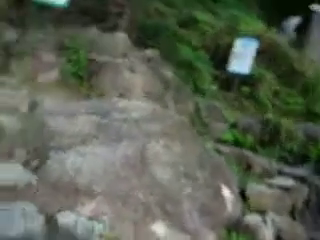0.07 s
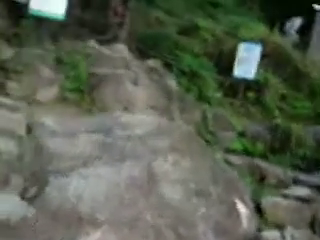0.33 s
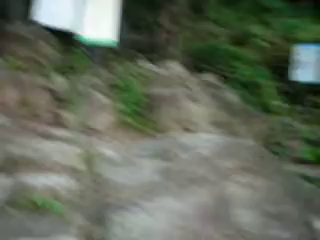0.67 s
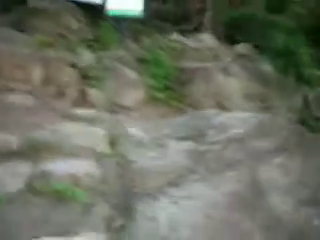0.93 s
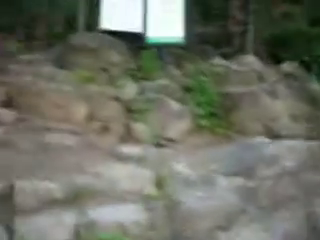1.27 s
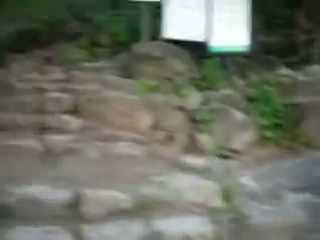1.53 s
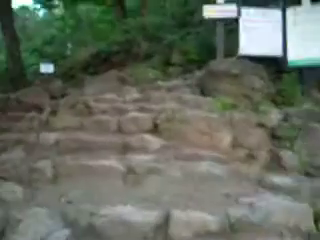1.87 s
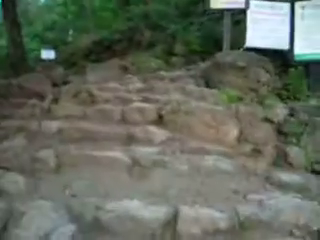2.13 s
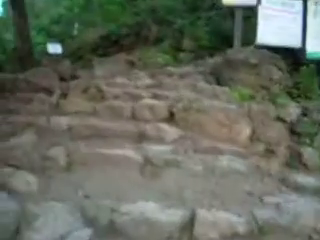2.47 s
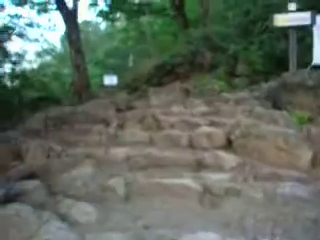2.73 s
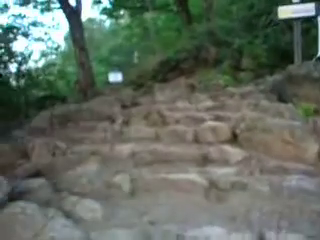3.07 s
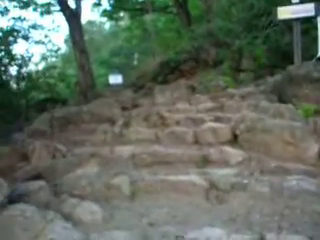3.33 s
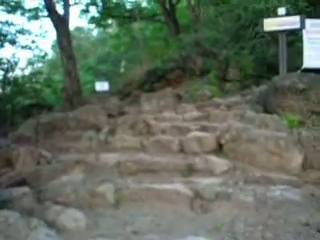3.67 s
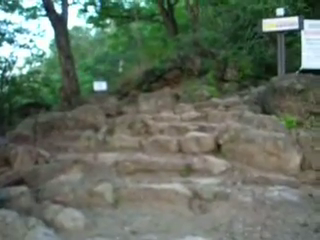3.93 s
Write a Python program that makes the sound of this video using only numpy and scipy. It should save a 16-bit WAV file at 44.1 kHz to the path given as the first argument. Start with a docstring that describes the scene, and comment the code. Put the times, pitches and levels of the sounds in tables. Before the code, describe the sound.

Camera handling clatter, with dull bumps and scattered clicks above a faint, steady outdoor hiss.

```python
"""Camera handled on a forest path

A small camera is carried and turned on a rocky path. Hard parts click and rattle against its case
and ring its modes; after two heavy knocks a loose part hums on. The hand bumps and rubs the shell.
Behind it runs a soft steady rush, like a stream or wind in leaves."""
import sys
import numpy as np
from scipy import signal
from scipy.fft import rfft, irfft
from scipy.io import wavfile
from scipy.ndimage import uniform_filter1d

SR = 44100
rng = np.random.default_rng(int(sys.argv[2]) if len(sys.argv) > 2 else 0)


def unload_wav(signal):
    """Save mono or channel-first audio to the path in sys.argv[1] as 16-bit WAV at rate SR, clipped to [-1, 1]."""
    wavfile.write(
        sys.argv[1],
        SR,
        np.round(np.clip(np.atleast_2d(signal).T, -1, 1) * 32767).astype(np.int16),
    )


N = 176400
T = np.arange(N) / SR
BAND_HZ = 4250


def from_db(db):
    """Decibels to gain."""
    return 10 ** (np.asarray(db) / 20)


def unit_rms(x):
    """Scale to rms 1."""
    return x / np.sqrt(np.mean(x ** 2) + 1e-20)


def add(out, start_s, x):
    """Mix x in at start_s."""
    i = max(int(start_s * SR), 0)
    out[i:i + len(x)] += x[:N - i]


def butter(x, hz, kind, order=2):
    """Butterworth low- or high-pass."""
    return signal.sosfilt(signal.butter(order, hz, kind, fs=SR, output="sos"), x + 1e-18)


def coloured(noise, spectrum):
    """Shape noise to a spectrum, cut just above BAND_HZ; rms 1."""
    hz = np.arange(N // 2 + 1) * SR / N + 1e-6
    points_hz, points_db = np.transpose(spectrum)
    gain = from_db(np.interp(np.log(hz), np.log(points_hz), points_db))
    return unit_rms(irfft(rfft(noise) * gain * (hz < 1.1 * BAND_HZ), N))


def drift(hz):
    """Random wander below hz; rms 1."""
    return unit_rms(butter(rng.standard_normal(N + SR), hz, "low")[SR:])


def ring(x, hz, t60_s):
    """One mode: a unit click starts a decaying sine of height 1."""
    radius, angle = from_db(-60 / (t60_s * SR)), 2 * np.pi * hz / SR
    return signal.lfilter([0, np.sin(angle)], [1, -2 * radius * np.cos(angle), radius ** 2], x + 1e-18)


def emphasise(x, hz, db, q=2.2):
    """Lift a broad band around hz."""
    return x + (from_db(db) - 1) * signal.lfilter(*signal.iirpeak(hz, q, fs=SR), x)


def disperse(x, q=1.08):
    """The shell delays each pitch differently, so a blow swells over about 1 ms."""
    for hz in np.geomspace(BAND_HZ / 5, BAND_HZ, 5):
        x = x - 2 * signal.lfilter(*signal.iirpeak(hz, q, fs=SR), x)  # all-pass
    return x


# Rush spectra: f/Hz, level/dB
RUSH_LOW_SPECTRUM = [(25, -17.5), (150, -15), (250, -4.5), (440, -2), (800, -4), (1200, -10), (4000, -29)]
RUSH_HIGH_SPECTRUM = [(300, -12), (800, -5), (1500, 1.34), (3400, 1.4), (3900, -3.5), (4400, -18)]
# Rush envelopes: t/s, level/dB
RUSH_LOW_LEVEL = [(0, -40.5), (.4, -46), (1.099, -44), (1.448, -48.5), (2.15, -43.5), (2.6, -48),
                  (3.3, -49), (3.6, -44), (4, -49)]
RUSH_HIGH_LEVEL = [(0, -40), (.22, -39.5), (.45, -44.5), (.8, -43.5), (1.1, -47), (1.5, -46),
                   (2.299, -45.5), (3.2, -47.5), (4, -48)]


def rush(flicker_db=1, flicker_hz=13):
    """Steady outdoor noise; its low and high parts shift as the camera turns."""
    out = np.zeros(N)
    for spectrum, envelope in ((RUSH_LOW_SPECTRUM, RUSH_LOW_LEVEL), (RUSH_HIGH_SPECTRUM, RUSH_HIGH_LEVEL)):
        db = np.interp(T, *np.transpose(envelope)) + flicker_db * drift(flicker_hz)
        out += from_db(db) * coloured(rng.standard_normal(N), spectrum)
    return out


# Rubs: t/s, level/dB, rise/s, decay/s, treble/dB
RUBS = [(0.142, -26.5, 0.0078, 0.013, -7), (0.161, -33, 0.0026, 0.011, 2), (0.229, -35.5, 0.0047, 0.013, 8),
        (0.908, -40, 0.0083, 0.11, 4), (1.214, -35, 0.0037, 0.016, 7), (1.789, -33.5, 0.014, 0.036, -7.5)]
# Friction spectrum: f/Hz, level/dB
RUB_SPECTRUM = [(100, -21), (300, 5.5), (1000, 3), (1600, 2.5), (3400, -2.5), (4300, -15.5)]


def hand_rubs(grains_per_s=2700, crossover_hz=2140):
    """The hand slides on the shell: short gritty swells of friction."""
    grains = rng.standard_normal(N) * (rng.random(N) < grains_per_s / SR)
    friction = coloured(grains, RUB_SPECTRUM)
    low = butter(friction, crossover_hz, "low")
    high = -butter(friction, crossover_hz, "high")  # inverted: no notch at the crossover
    out = np.zeros(N)
    for peak_s, db, rise_s, decay_s, treble_db in RUBS:
        swell = np.exp(np.minimum((T - peak_s) / rise_s, (peak_s - T) / decay_s))
        out += from_db(db) * swell * (low + from_db(treble_db) * high)
    return out


# Bumps: t/s, level/dB, f/Hz
BUMPS = [(.020, -29, 187), (0.146, -26.5, 278), (.156, -30.5, 180), (.327, -28, 530), (0.778, -31.5, 242),
         (0.962, -31.5, 198), (1.054, -37, 175), (1.074, -30.5, 190), (1.1, -35.5, 189),
         (1.212, -32.5, 148), (1.332, -33, 178), (1.58, -32, 108), (1.718, -33.5, 196), (1.779, -33, 188),
         (2.199, -37, 150), (2.877, -32.5, 227)]


def hand_bumps(decay_cycles=1.86, low_cut_hz=89):
    """Soft pushes of the hand: dull thuds of a cycle or two."""
    out, t = np.zeros(N), T[:SR // 10]
    for start_s, db, hz in BUMPS:
        age = t * hz * np.log(1000) / decay_cycles
        envelope = age * np.exp(1 - age)
        add(out, start_s, from_db(db) * envelope * np.sin(2 * np.pi * hz * t))
    return butter(out, low_cut_hz, "high")


# Loose part set ringing: t/s, hum/dB, ring/dB
LOOSE_STRIKES = [(.675, -38, -48), (1.581, -42, -35)]
# Its low and high modes: f/Hz, level/dB, t60/s
HUM_MODES = [(232.5, -1, 1.62)]
RING_MODES = [(2650, -1, .2), (2760, 1.5, 0.24), (3115, -9, .45)]


def loose_part():
    """A loose part sounds on after two heavy knocks: low hum, thin high ring."""
    out = np.zeros(N)
    for start_s, hum_db, ring_db in LOOSE_STRIKES:
        for modes, strike_db in ((HUM_MODES, hum_db), (RING_MODES, ring_db)):
            for hz, mode_db, t60_s in modes:
                envelope = from_db(strike_db + mode_db - 60 * T / t60_s)
                add(out, start_s, envelope * np.sin(2 * np.pi * hz * T))
    return out


# Ticks: t/s, peak/dB
TICKS = [(2.6868, -25), (3.2636, -15)]


def ticks(decay_s=0.0044):
    """Light dry snaps that barely stir the case."""
    out, t = np.zeros(N), T[:SR // 20]
    for start_s, db in TICKS:
        drive = rng.standard_normal(len(t)) * np.exp(-t / decay_s)
        drive[0] += 2 * np.linalg.norm(drive)  # first contact
        drive = butter(drive, 300, "high", order=1)
        snap = disperse(butter(drive, BAND_HZ, "low", order=6))
        add(out, start_s, from_db(db) * snap / np.abs(snap).max())
    return out


# Tail spectra: f/Hz, level/dB
QUICK_TAIL = [(100, -12), (500, 7.5), (1450, -0.5), (2000, -14), (2700, -2.5), (3400, 2), (4300, -10)]
LONG_TAIL = [(100, -22), (450, 1), (1450, -2.5), (2000, -3.5), (2800, 6), (4300, -8.5)]


def knock_tails(quick_t60_s=0.17, quick_db=-14, long_t60_s=0.7, long_db=-26):
    """Each knock leaves a quick diffuse tail and a faint long one; damped knocks leave less."""
    out = np.zeros(N)
    for spectrum, t60_s, tail_db in ((QUICK_TAIL, quick_t60_s, quick_db), (LONG_TAIL, long_t60_s, long_db)):
        power, fade = np.zeros(N), from_db(-60 * T / t60_s)
        for start_s, knock_db, *_, ring_scale in KNOCKS:
            add(power, start_s, (from_db(knock_db + tail_db) * ring_scale * fade) ** 2)
        out += np.sqrt(power) * coloured(rng.standard_normal(N), spectrum)
    return out


# Knocks: t/s, level/dB, chatter decay/s, emphasis f/Hz, emphasis/dB, ring time scale
KNOCKS = [(.5348, -9.5, 0.0021, 1440, 10.5, 0.34), (.5410, -14, 0.0023, 2560, 11, 0.75),
          (.5485, -21.5, 0.011, 1400, 6, 1.7), (.5958, -22, .005, 1490, 3.5, 1.6),
          (0.6132, -22.5, 0.0014, 1490, 21, 1.4), (.6224, -12.5, 0.0046, 3430, 17, 1.16),
          (.6290, -23.5, 0.0021, 2800, 3, 1.1), (0.6372, -19.5, 0.0096, 3300, 2, 1.43),
          (0.6712, -9.5, 0.0029, 1440, 10, 0.35), (.6788, -18, .0025, 3350, 17, 0.87),
          (.7800, -32, .002, 2500, 3.5, .4), (1.5700, -19, 0.0034, 1070, 7.5, 1.05),
          (1.5775, -13, 0.0016, 2623, 17.5, 1.24), (1.5784, -20, .002, 1070, 13, 0.49),
          (2.1726, -32, 0.0046, 910, 17, 0.82), (2.482, -38.5, 0.0016, 1110, 17, 0.57),
          (2.7102, -17.5, .0014, 1050, 21, .25), (2.7112, -20, 0.0013, 1550, 17, .25),
          (2.7180, -25, 0.015, 744, 28, .6), (2.7238, -24.5, 0.0058, 1030, 7.5, 0.42),
          (2.7282, -31.5, 0.0027, 2830, 16, 0.46), (2.8780, -35, 0.0036, 795, 7, 1.1)]
# Case modes: f/Hz, level/dB, unscaled t60/s
CASE_MODES = [(420, -16.5, 0.013), (660, -24, 0.13), (1036, -23, 0.032), (1330, -6, 0.023),
              (1440, -4.5, 0.049), (1511, -10, 0.058), (1605, -10.5, 0.037), (2120, -13, 0.022),
              (2390, -4.5, 0.026), (2830, -10.5, 0.025), (2802, -11, 0.038), (3200, -10, 0.017),
              (3307, -7.5, 0.048)]


def knocks(chatter_rise_s=0.0017, contact_db=-1.5, crack_db=18):
    """Hard parts hit, chatter and ring the case; the spot struck favours a band, the grip damps it."""
    out, t = np.zeros(N), T[:SR // 8]
    for start_s, db, chatter_s, emphasis_hz, emphasis_db, ring_scale in KNOCKS:
        envelope = (1 - np.exp(-t / chatter_rise_s)) * np.exp(-t / chatter_s)
        drive = rng.standard_normal(len(t)) * envelope
        drive /= np.linalg.norm(drive)
        drive[0] += from_db(contact_db)
        body = sum((-1) ** k * from_db(mode_db) * ring(drive, hz, t60_s * ring_scale)
                   for k, (hz, mode_db, t60_s) in enumerate(CASE_MODES))
        crack = butter(butter(drive, 414, "high"), 3645, "low", order=6)
        crack *= from_db(crack_db) * SR / (2 * BAND_HZ)
        hit = emphasise(disperse(body + crack), emphasis_hz, emphasis_db)
        peak_power = uniform_filter1d(hit ** 2, size=176, mode="constant").max()  # loudest 4 ms
        add(out, start_s, from_db(db) * hit / np.sqrt(peak_power))
    return out


def scene():
    """Handling sounds over the rush, mono."""
    return (rush() + hand_rubs() + knock_tails() + knocks() + ticks() + loose_part() + hand_bumps())[None]


def record(dry, roll_off_hz=3701, dc_offset=-0.02, clip_level=0.68, cutoff_hz=16000):
    """Narrow-band electronics sit slightly off zero; the tallest peaks overload with a thin snap."""
    dull = butter(dry, roll_off_hz, "low", order=8)
    narrow = signal.sosfilt(signal.ellip(8, 0.3, 75, BAND_HZ, fs=SR, output="sos"), dull)
    clipped = np.clip(narrow + dc_offset, -clip_level, clip_level)
    return signal.sosfilt(signal.cheby2(12, 70, cutoff_hz, fs=SR, output="sos"), clipped)


dry = scene()
out = record(dry)
unload_wav(out)
```